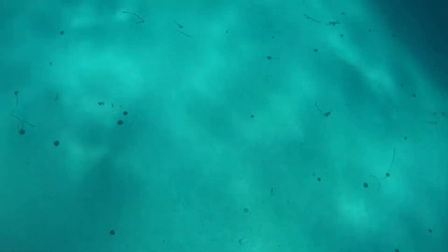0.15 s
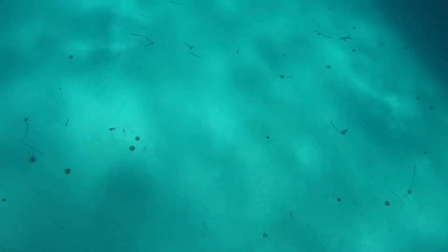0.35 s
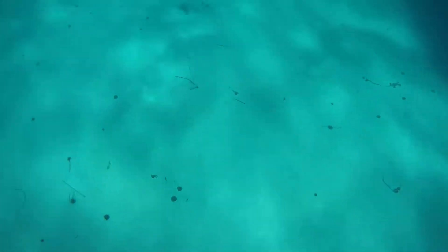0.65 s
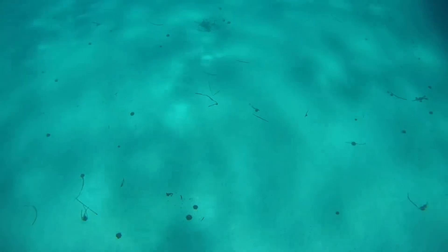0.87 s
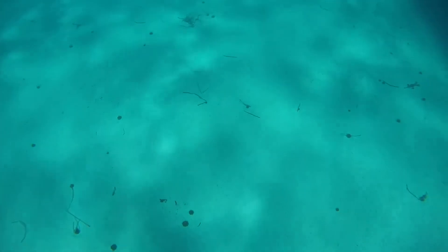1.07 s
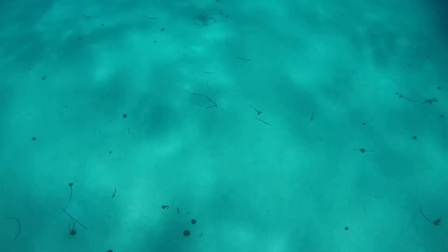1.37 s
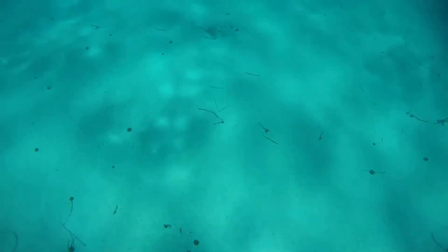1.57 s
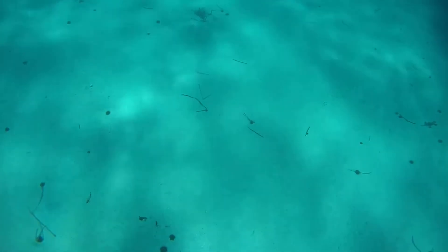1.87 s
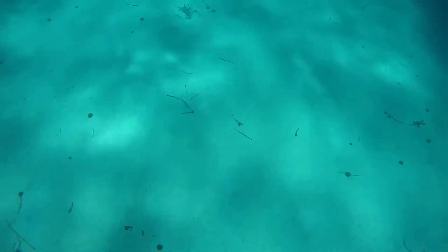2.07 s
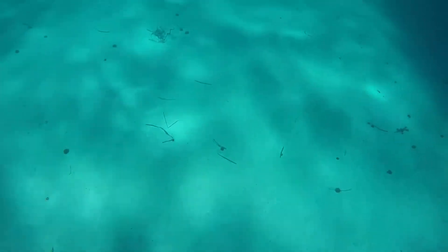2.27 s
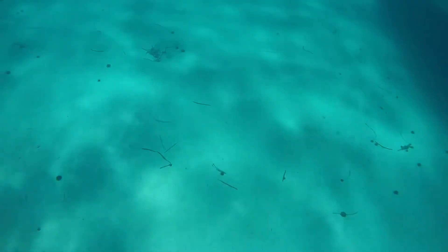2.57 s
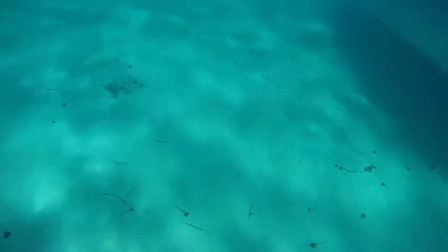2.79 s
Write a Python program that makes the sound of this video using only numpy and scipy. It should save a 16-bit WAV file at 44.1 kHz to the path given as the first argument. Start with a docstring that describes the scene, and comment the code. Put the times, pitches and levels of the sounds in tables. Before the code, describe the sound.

Bubbles bloop and gurgle underwater as moving water bumps a camera housing; a dense, bubbly opening gradually calms to scattered plips and soft thuds, with uneven rumble and thin high hiss throughout.

```python
"""Underwater, beside a boat: water moves round a submerged camera.
Air bubbles break loose and ring as decaying sines, close ones as clear bloops, many others as a murmur.
Eddies gulp as sines of falling pitch, and damped swings bump the housing over a low rumble of noise.
The camera's electronics add coloured noise as hiss, pulses as ticks and thin sines as whine and whistles."""
import sys
import numpy as np
from scipy import signal
from scipy.fft import rfft, irfft, next_fast_len
from scipy.io import wavfile

SR = 44100
rng = np.random.default_rng(int(sys.argv[2]) if len(sys.argv) > 2 else 0)


def output_pcm(signal):
    """Save a mono or channel-first signal as 16-bit PCM at the path in sys.argv[1].

    Samples are clipped to [-1, 1] before scaling.
    """
    pcm = np.clip(np.atleast_2d(signal).T, -1, 1) * 32767
    wavfile.write(sys.argv[1], SR, np.round(pcm).astype(np.int16))


N = 129213
TIME = np.arange(N) / SR  # s


def from_db(db):
    """Level: a gain of 10 to the power dB / 20."""
    return 10 ** (np.asarray(db) / 20)


def rms_one(x):
    """Normalisation: scale a signal to rms 1."""
    return x / np.sqrt(np.mean(x ** 2) + 1e-20)


def coloured(x, spectrum):
    """Linear filtering: weight the spectrum by a curve through (Hz, dB) points, then scale to rms 1."""
    hz, db = np.transpose(spectrum)
    size = next_fast_len(N + 8192)
    log_hz = np.log(np.arange(size // 2 + 1) * SR / size + 1e-3)
    below = np.maximum(np.log(hz[0]) - log_hz, 0)
    above = np.maximum(log_hz - np.log(hz[-1]), 0)
    # Outside the points the curve falls 60 dB for each factor e in frequency.
    gain = from_db(np.interp(log_hz, np.log(hz), db) - 60 * (below + above))
    return rms_one(irfft(rfft(x, size) * gain, size)[:N])


def noise(spectrum):
    """Random noise: white noise shaped by a spectral density, rms 1."""
    return coloured(rng.standard_normal(N), spectrum)


def band_noise(low_hz, high_hz):
    """Band-limited noise: white noise through a bandpass, rms 1."""
    bandpass = signal.butter(2, [low_hz, high_hz], "band", fs=SR, output="sos")
    return rms_one(signal.sosfilt(bandpass, rng.standard_normal(N)))


def drift(rate_hz):
    """Slow random fluctuation: noise through a double-pole lowpass, rms about 1."""
    step = 40  # samples between the computed points
    pole = np.exp(-2 * np.pi * rate_hz * step / SR)
    white = rng.standard_normal(N // step + 2002)
    slow = signal.lfilter([1], [1, -2 * pole, pole * pole], white)[2000:]  # drop the settling
    return np.interp(np.arange(N) / step, np.arange(len(slow)), rms_one(slow))


def add(out, start_s, sound):
    """Superposition: mix a sound in at its start time."""
    i = int(np.clip(start_s * SR, 0, N - 1))
    out[i:i + len(sound)] += sound[:N - i]


def muffled(x):
    """Transmission loss: the housing passes little of the upper range, which rounds off the attacks."""
    lowpass = signal.butter(6, 887, fs=SR, output="sos")  # corner in Hz
    return signal.sosfilt(lowpass, x + 1e-18)


def bubble(hz, t60_s):
    """Bubble resonance: a sine swells quickly, climbs slightly in pitch and decays exponentially."""
    attack_s, rise_per_s = 0.0024, 0.14  # the rise is relative to the starting pitch
    t = TIME[:int(t60_s * SR) + 2]
    onset = np.sin(np.pi / 2 * np.minimum(t / attack_s, 1)) ** 2
    decay = from_db(-60 * t / t60_s)
    return onset * decay * np.sin(2 * np.pi * hz * (t + rise_per_s * t * t / 2))


def swarm(low_hz, high_hz, cycles, spread_db, count):
    """Incoherent sum: many bubbles of random pitch, strength and damping ring throughout the scene."""
    out = np.zeros(N)
    for k, (when, pitch, strength, damping) in enumerate(rng.random((count, 4))):
        start_s = (k + when) / count * N / SR  # one bubble at random in each equal slot
        hz = low_hz * (high_hz / low_hz) ** pitch
        t60_s = cycles * (.5 + damping) / hz
        add(out, start_s, from_db(spread_db * strength ** 2) * bubble(hz, t60_s))
    return out


def throbbing_hiss():
    """Amplitude modulation: a periodic envelope opens and closes high coloured noise."""
    # Each row: frequency in Hz, relative density in dB per Hz.
    throb_colour = [(7500, -20), (8600, 1), (9200, -4), (9750, 2.5), (10600, -5), (12100, 2.5), (13200, -4),
                    (15500, -4)]
    crest_s, period_s, edge = 0.056, .1746, 1.6  # a larger edge squares the envelope
    swing = np.cos(2 * np.pi * (TIME - crest_s) / period_s)
    throb = .5 + .5 * np.tanh(edge * swing)
    return from_db(-63.5) * throb * noise(throb_colour)


def ticks(tick_hz):
    """Periodic excitation: a train of unit pulses is coloured into a faint high buzz."""
    # Each row: frequency in Hz, relative gain in dB.
    tick_colour = [(7500, -20), (8600, 1), (9200, -4), (9750, 2.5), (10600, -5), (12100, 2.5), (13200, -4),
                   (15500, -4)]
    first_s = 0.0155
    pulses = np.zeros(N)
    pulses[(np.arange(first_s, (N - 1) / SR, 1 / tick_hz) * SR).astype(int)] = 1
    return from_db(-70) * coloured(pulses, tick_colour)


def whine(tick_hz):
    """Phase and amplitude modulation: a thin sine wanders in phase and beats at the tick rate."""
    whine_hz, wander_rad, buzz_depth = 7852, 0.71, .8
    tone = np.sin(2 * np.pi * whine_hz * TIME + wander_rad * drift(3.5))
    beat = 1 + buzz_depth * np.cos(2 * np.pi * tick_hz * TIME)
    return from_db(-75) * rms_one(tone * beat)


def whistles():
    """Frequency modulation: two high sines waver at random in pitch and soon stop."""
    # Each row: mean frequency in Hz, rms waver in Hz, rms level in dB before the fade.
    whistle_tones = [(9790, 69, -66), (11340, 115, -67.5)]
    end_s, fade_s = 0.27, 0.02
    fade = np.clip((end_s - TIME) / fade_s, 0, 1)
    out = np.zeros(N)
    for hz, waver_hz, db in whistle_tones:
        whistle = np.sin(2 * np.pi * np.cumsum(hz + waver_hz * drift(120)) / SR)
        out += from_db(db) * rms_one(whistle) * fade
    return out


def electronics():
    """Superposition: the camera's steady hiss adds to its throbbing hiss, ticks, whine and whistles."""
    # Each row: frequency in Hz, relative density in dB per Hz.
    hiss_colour = [(1500, 6), (3000, 3.5), (5000, 0), (7000, -0.5), (10000, -1.5), (15500, -3)]
    tick_hz = 59.94
    hiss = from_db(-59) * noise(hiss_colour)
    return hiss + throbbing_hiss() + ticks(tick_hz) + whine(tick_hz) + whistles()


def stirred_water():
    """Flow noise: distant bubbles murmur and fizz over uneven wash and a rumble; surges shift their levels."""
    # Each row of the three colours: frequency in Hz, relative level in dB (per Hz for noise).
    murmur_colour = [(200, -11.5), (320, -7.5), (440, 0), (550, 1.5), (650, -8.5), (790, 1), (900, -8.5),
                     (1060, -14)]
    fizz_colour = [(1000, -32), (1130, -15), (1360, 2), (1630, -9.5), (1900, -4), (2300, -12.5),
                   (3200, -22), (6000, -29)]
    rumble_colour = [(22, -6), (40, -2), (62, 1.5), (95, -1.5), (135, 2.5), (200, -2.5), (300, -7.5),
                     (600, -40)]
    # Surges of the flow. Each row: crest time in seconds, half-length in seconds (to 1/e of the lift),
    # then the lifts of murmur, fizz and rumble in dB.
    surges = [(0.022, 0.044, 5.5, -1, 7), (0.174, 0.084, 4.5, 3, 0.5), (0.42, 0.093, 1.5, -3.5, 5.5),
              (0.662, 0.092, 4.5, 4.5, -0.5), (0.8, 0.024, -1, 0, 8), (0.875, 0.018, 8, 11, 10),
              (1, 0.089, 1.5, 3, 5.5), (1.194, 0.075, 1, 4, -1), (1.723, 0.063, 0, 4, 3),
              (1.987, 0.018, 6, 6, 8.5), (2.557, 0.062, 5, 5.5, -1.5), (2.852, 0.047, 6, 0.5, 8)]
    # Levels in dB at the start and end, before surges: murmur and fizz slowly calm.
    murmur_db, fizz_db, rumble_db = (-37.5, -43), (-51, -59.5), (-44, -44)
    level_db = np.array([np.linspace(start, end, N) for start, end in (murmur_db, fizz_db, rumble_db)])
    for crest_s, half_length_s, *lifts_db in surges:
        level_db += np.outer(lifts_db, np.exp(-((TIME - crest_s) / half_length_s) ** 2))

    churn = drift(34)  # one fluctuation shared by all three layers
    murmur_bubbles = coloured(swarm(245.7, 1028, cycles=17.0, spread_db=6, count=900), murmur_colour)
    murmur_wash = from_db(-7.5 + 2.7 * churn) * noise(murmur_colour)
    fizz_bubbles = coloured(swarm(1055, 2850, cycles=20, spread_db=12.5, count=1500), fizz_colour)
    fizz_wash = from_db(-4.5 + 4.0 * churn) * noise(fizz_colour)
    murmur = rms_one(murmur_bubbles + murmur_wash)
    fizz = rms_one(fizz_bubbles + fizz_wash)
    rumble = noise(rumble_colour) * from_db(1.4 * churn)
    return np.sum(from_db(level_db) * [murmur, fizz, rumble], axis=0)


def cloud():
    """Incoherent sum: a dense cloud of small bubbles swells and fades as it drifts past."""
    crest_s, half_length_s = 0.737, 0.046  # half-length to 1/e of the crest
    passing = np.exp(-((TIME - crest_s) / half_length_s) ** 2)
    small_bubbles = rms_one(swarm(1060, 1880, cycles=17, spread_db=3, count=2500))
    return from_db(-44.5) * passing * small_bubbles


def crackles():
    """Transient noise: tiny bright snaps start abruptly and decay exponentially, each in its own band."""
    # Each row: start in seconds, starting level in dB, centre in Hz, 60 dB decay time in seconds.
    snaps = [(0.064, -37, 1710, 0.055), (0.096, -45.5, 3200, 0.045), (0.129, -48, 2400, .12),
             (0.128, -53, 7200, .05), (1.96, -35.5, 1560, 0.029), (1.9635, -48, 5400, 0.016),
             (1.998, -43.5, 2020, 0.022)]
    width = 1.18  # band edges, as a ratio to the centre
    out, t = np.zeros(N), TIME[:SR // 10]
    for start_s, db, hz, t60_s in snaps:
        decay = from_db(db - 60 * t / t60_s)
        add(out, start_s, decay * band_noise(hz / width, hz * width)[:len(t)])
    return out


def bumps():
    """Damped oscillation: water knocks the housing into a few heavily damped swings."""
    # Each row: start in seconds, pitch in Hz, envelope peak in dB before muffling, swings until the peak.
    knocks = [(0.363, 328, -20.5, 0.53), (0.4334, 338, -15.5, 0.56), (0.4627, 247, -18.5, 0.52),
              (0.4695, 178, -17.5, 0.57), (0.5615, 304, -25.5, 1.7), (0.8868, 160, -17, 0.67),
              (1.0034, 192, -21, .5), (1.2552, 500, -9, 1.4), (1.707, 350, -24.5, 0.4),
              (1.9866, 467, -23, 0.49), (2.0243, 146, -22.5, 0.64), (2.813, 448, -19, 1.2),
              (2.8851, 277, -28, .4)]
    out = np.zeros(N)
    for start_s, hz, db, swings in knocks:
        cycles = hz * TIME[:SR // 10]
        u = cycles / swings
        envelope = (u * np.exp(1 - u)) ** 3  # peaks at u = 1
        add(out, start_s, from_db(db) * envelope * np.sin(2 * np.pi * cycles))
    return muffled(out)


def gulps():
    """Frequency glide: each eddy swells and collapses as its pitch falls, and churns up a low froth."""
    # Each row: start in seconds, length in seconds, start pitch in Hz, end pitch in Hz,
    # peak of the swell in dB before roughness.
    eddies = [(0.392, 0.028, 348, 297, -25), (0.444, 0.048, 424.6, 150.7, -24),
              (0.893, 0.071, 354, 272, -28), (0.937, 0.049, 175, 133, -30), (0.961, 0.0603, 247, 203, -25),
              (1.707, 0.04, 282, 109, -27.5), (1.998, 0.047, 240.6, 114, -28),
              (2.602, 0.026, 473, 139, -28.5), (2.689, 0.013, 352, 110, -26.5)]
    crest = 0.64  # share of the length at which a gulp is strongest
    roughness, froth_db = .3, -10  # the froth level is relative to the swell
    tone, froth = np.zeros((2, N))
    for start_s, length_s, start_hz, end_hz, db in eddies:
        u = np.linspace(0, 1, int(length_s * SR))
        swell = from_db(db) * np.sin(np.pi / 2 * np.interp(u, [0, crest, 1], [0, 1, 0])) ** 2
        hz = start_hz * (end_hz / start_hz) ** u
        add(tone, start_s, swell * np.sin(2 * np.pi * np.cumsum(hz) / SR))
        add(froth, start_s, swell)
    rough_tone = tone * (1 + roughness * drift(77))
    return rough_tone + from_db(froth_db) * froth * band_noise(104, 360)


def close_bubbles():
    """Bubble resonance: large bubbles bloop low through the housing, small ones plip high."""
    # Each row: start in seconds, starting pitch in Hz, level in dB before decay and muffling,
    # 60 dB decay time in seconds.
    large_bubbles = [(0.033, 510, -20, 0.057), (0.034, 873, -18.5, 0.058), (0.193, 835, -21.5, 0.1),
                     (0.199, 458, -14.5, 0.037), (0.336, 475, -20.5, 0.14), (0.554, 742, -24, 0.12),
                     (0.565, 465, -21, 0.16), (0.580, 782, -26.5, 0.14), (0.649, 815, -20, 0.11),
                     (0.854, 795, -22.5, 0.092), (0.875, 522, -26, 0.085), (0.968, 800, -9, 0.092),
                     (1.162, 517, -10.5, 0.062), (1.164, 747, -26.5, 0.12), (1.196, 497, -22, 0.052),
                     (1.262, 530, -13, 0.17), (1.412, 867, -28.5, 0.093), (1.573, 408, -21.5, 0.23),
                     (1.744, 535.7, -20, 0.2), (1.962, 559, -22.5, 0.12), (1.994, 524, -18, 0.036),
                     (2.264, 400.7, -26, 0.15), (2.470, 571, -32.5, 0.24), (2.562, 510, -26.5, 0.088),
                     (2.626, 436, -22.5, 0.06), (2.756, 635, -27, 0.1), (2.813, 425, -27.5, 0.44),
                     (2.822, 856, -27.5, 0.087), (2.885, 392.3, -28.5, 0.45)]
    # Each row: start in seconds, level in dB before the common gain and decay, starting pitch in Hz.
    small_bubbles = [(0.192, -26.5, 1314), (0.236, -32, 1970), (1.051, -32, 1322), (1.248, -28.5, 1390),
                     (1.352, -35.5, 1394), (1.443, -34.5, 2005), (1.6, -28.5, 1292), (2.135, -31.5, 1560),
                     (2.305, -26, 1440), (2.467, -36.5, 1520), (2.563, -32, 1245)]
    plip_t60_s, plip_gain_db = 0.052, -2.5
    bloops, plips = np.zeros((2, N))
    for start_s, hz, db, t60_s in large_bubbles:
        add(bloops, start_s, from_db(db) * bubble(hz, t60_s))
    for start_s, db, hz in small_bubbles:
        add(plips, start_s, from_db(db + plip_gain_db) * bubble(hz, plip_t60_s))
    return muffled(bloops) + plips


def scene():
    """Superposition: everything adds up at the submerged microphone."""
    background = electronics() + stirred_water() + cloud()
    events = crackles() + bumps() + gulps() + close_bubbles()
    return (background + events)[None]


def record(dry):
    """Band limitation: a steep elliptic lowpass cuts the top."""
    lowpass = signal.ellip(12, .1, 80, 15400, fs=SR, output="sos")  # ripple dB, stopband dB, cutoff Hz
    return signal.sosfilt(lowpass, dry)


dry = scene()
out = record(dry)
output_pcm(out)
```